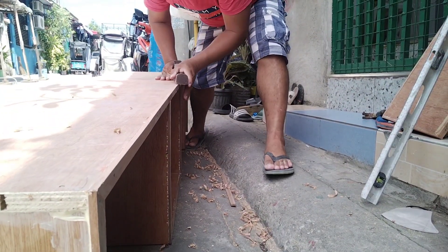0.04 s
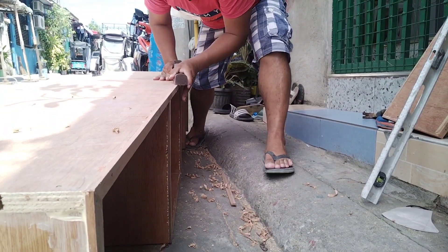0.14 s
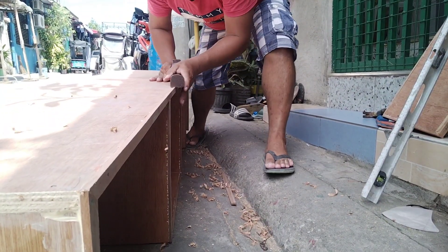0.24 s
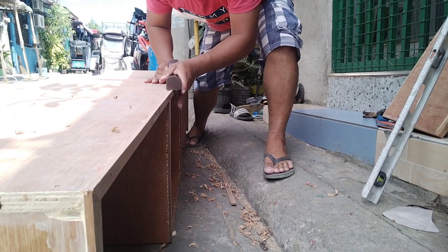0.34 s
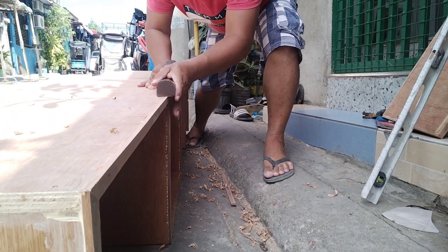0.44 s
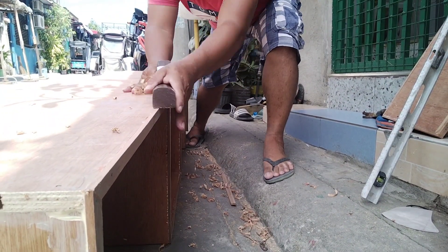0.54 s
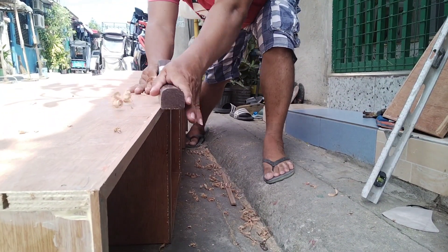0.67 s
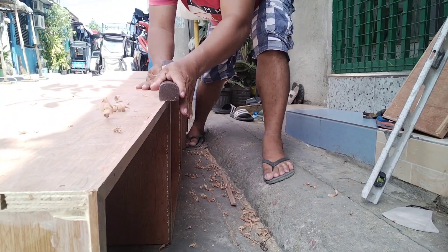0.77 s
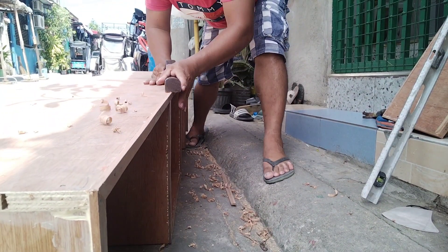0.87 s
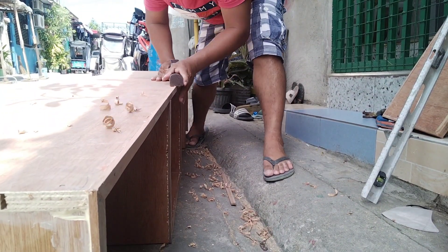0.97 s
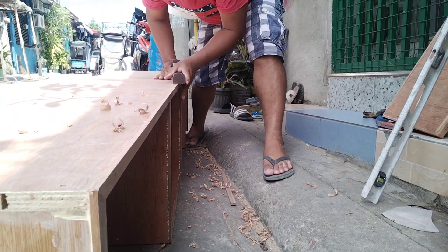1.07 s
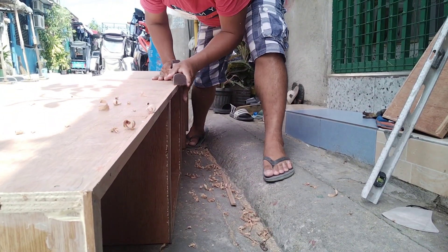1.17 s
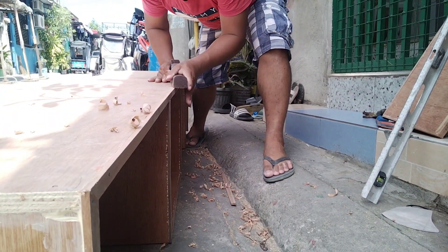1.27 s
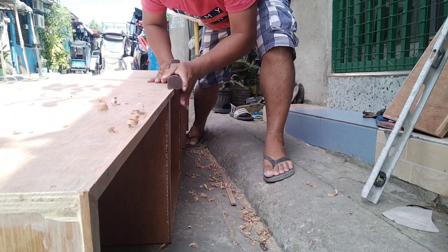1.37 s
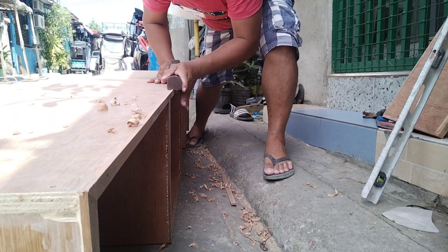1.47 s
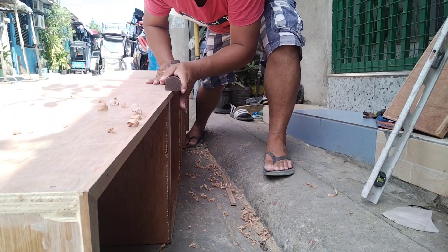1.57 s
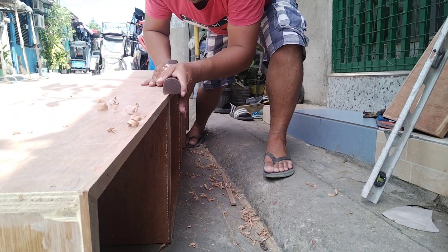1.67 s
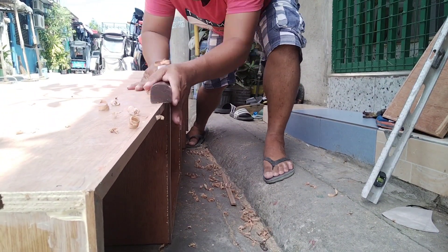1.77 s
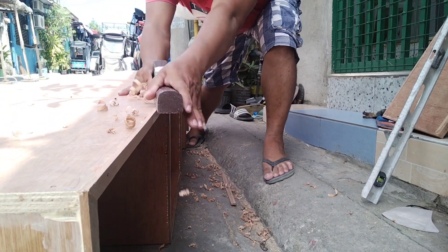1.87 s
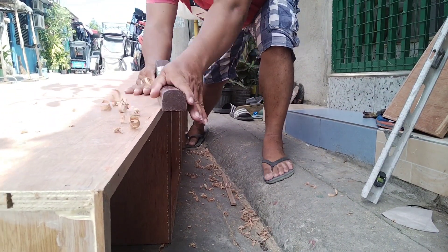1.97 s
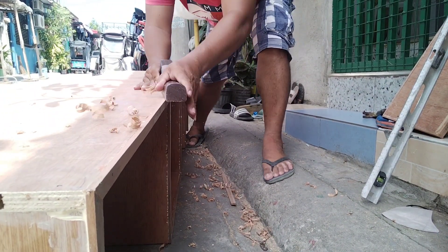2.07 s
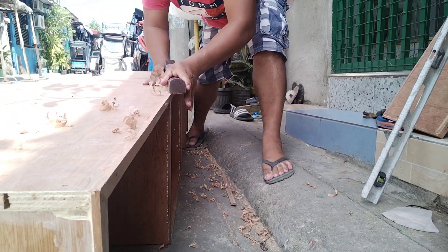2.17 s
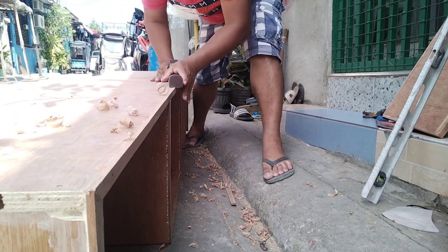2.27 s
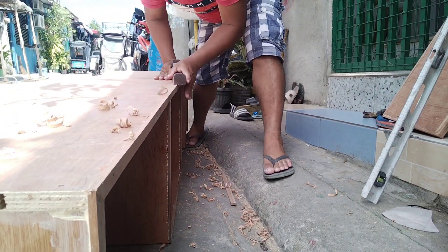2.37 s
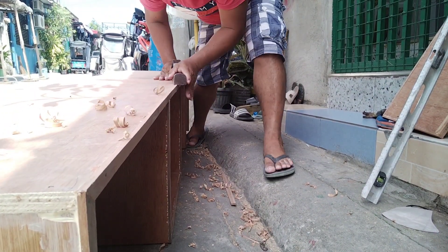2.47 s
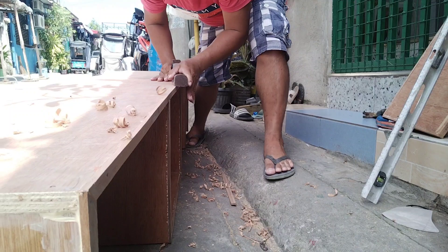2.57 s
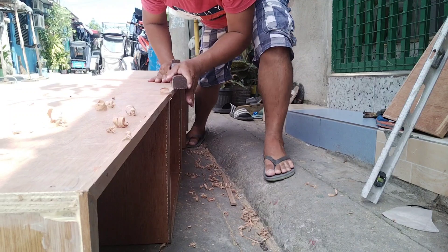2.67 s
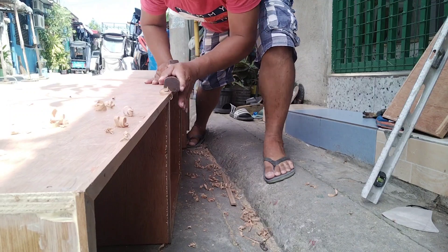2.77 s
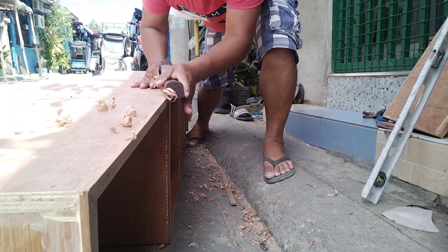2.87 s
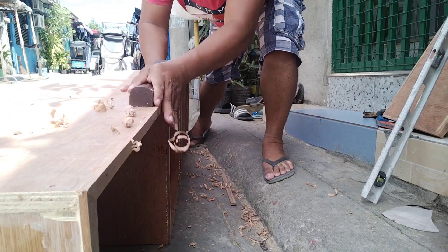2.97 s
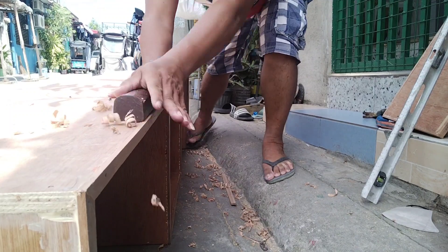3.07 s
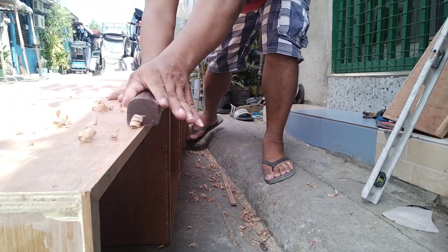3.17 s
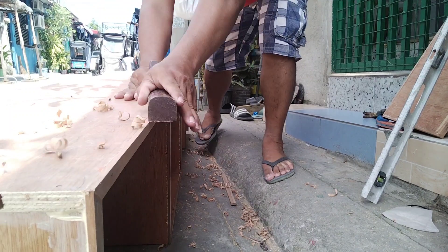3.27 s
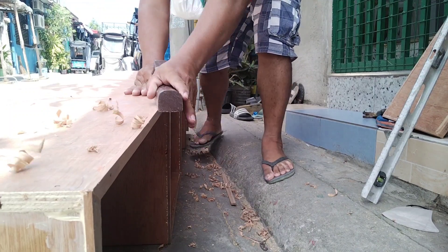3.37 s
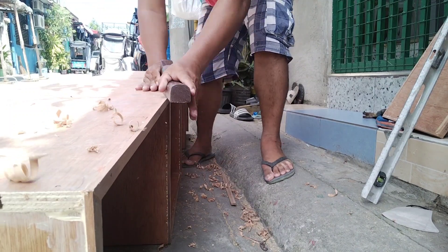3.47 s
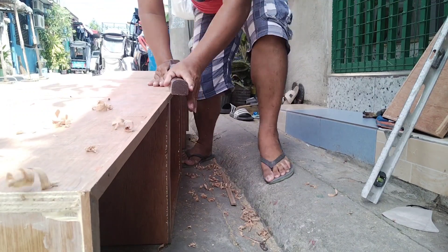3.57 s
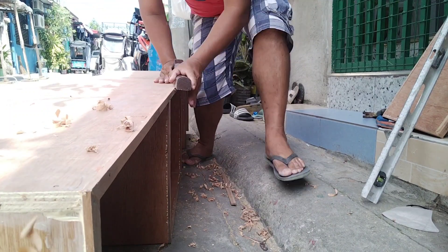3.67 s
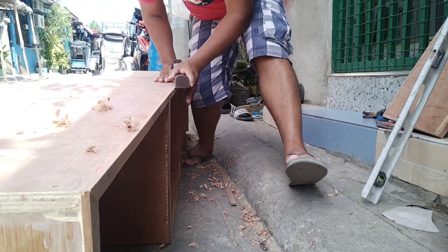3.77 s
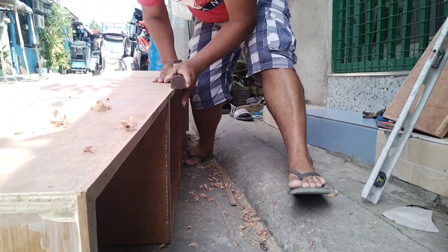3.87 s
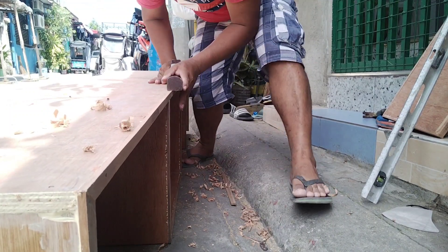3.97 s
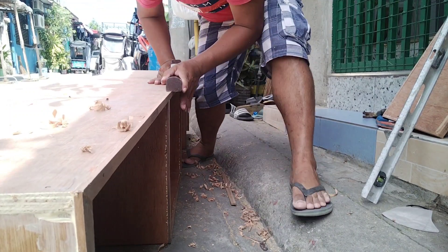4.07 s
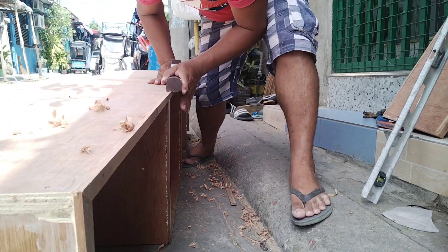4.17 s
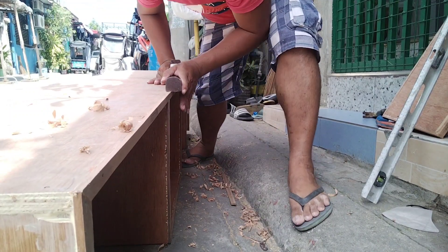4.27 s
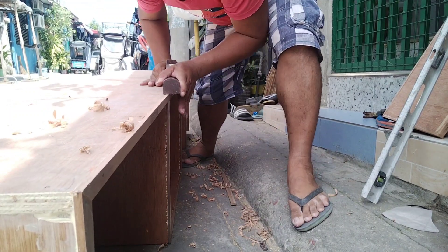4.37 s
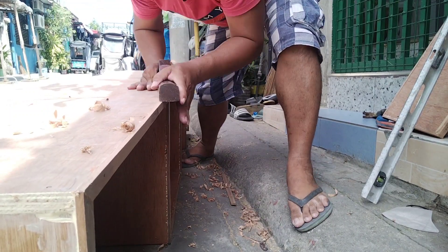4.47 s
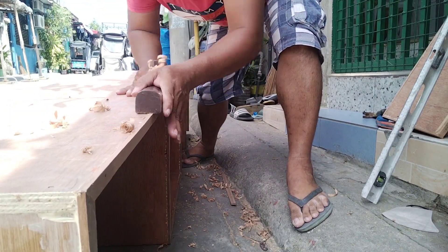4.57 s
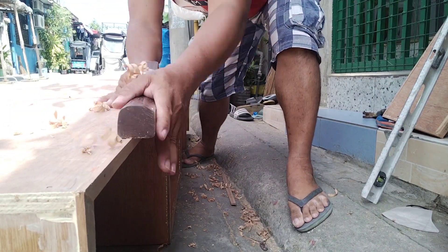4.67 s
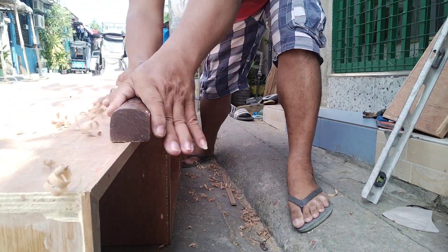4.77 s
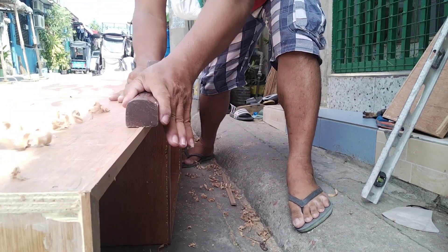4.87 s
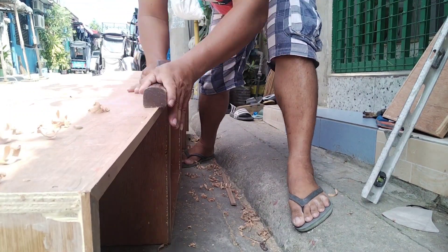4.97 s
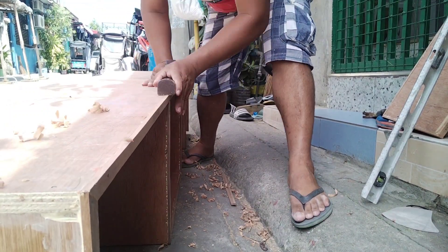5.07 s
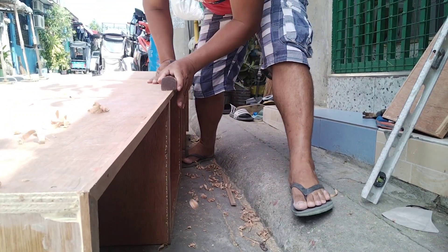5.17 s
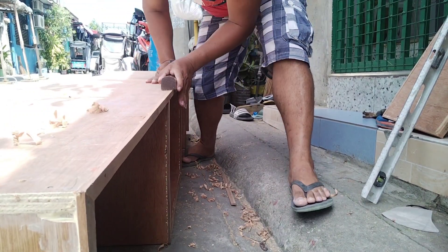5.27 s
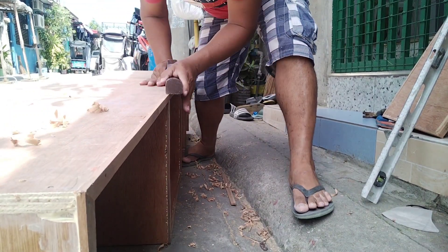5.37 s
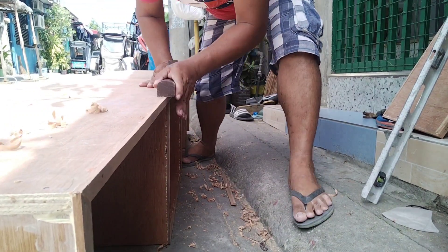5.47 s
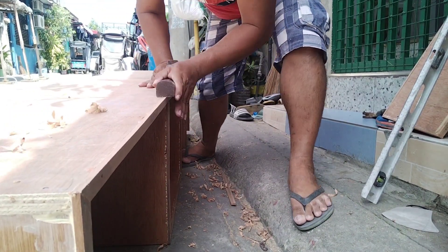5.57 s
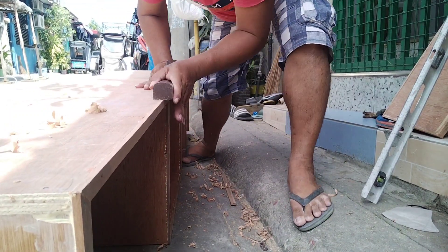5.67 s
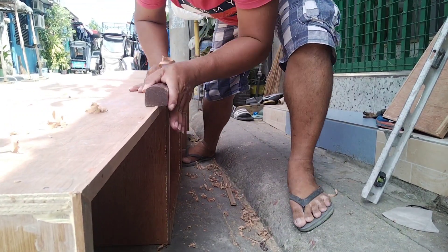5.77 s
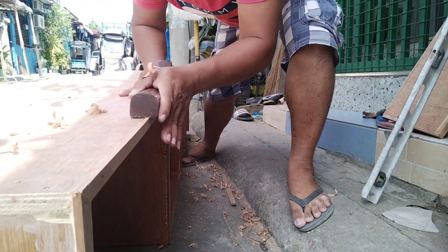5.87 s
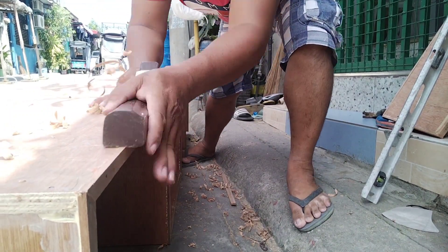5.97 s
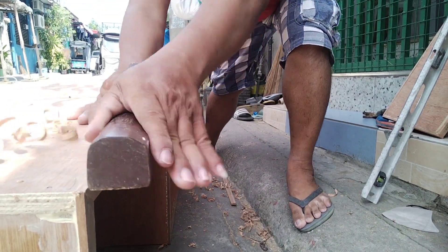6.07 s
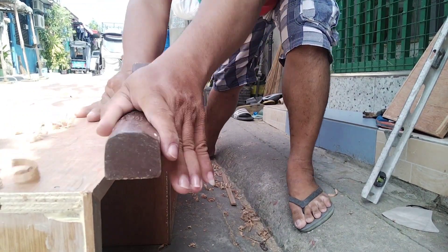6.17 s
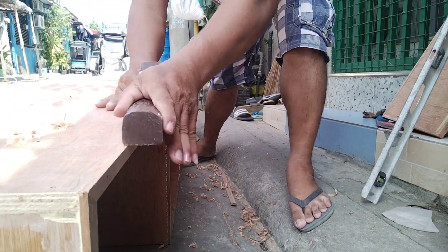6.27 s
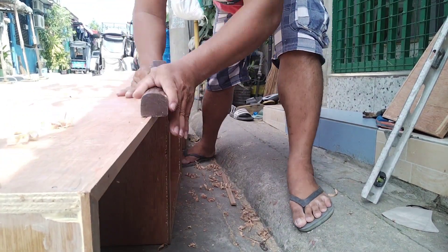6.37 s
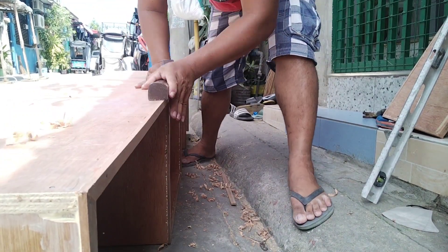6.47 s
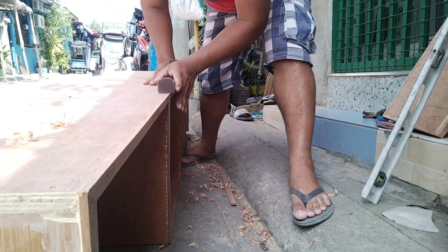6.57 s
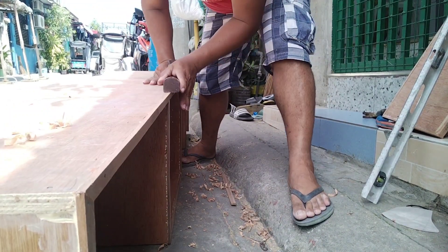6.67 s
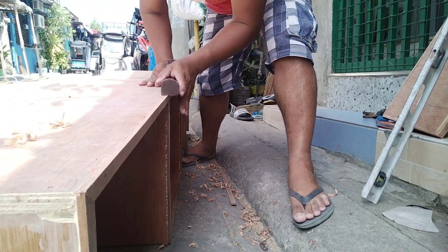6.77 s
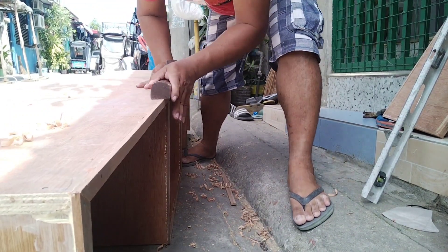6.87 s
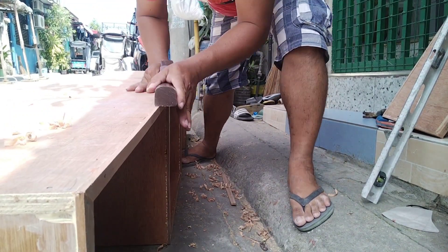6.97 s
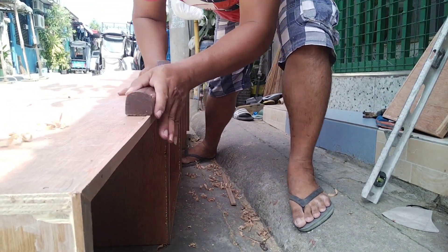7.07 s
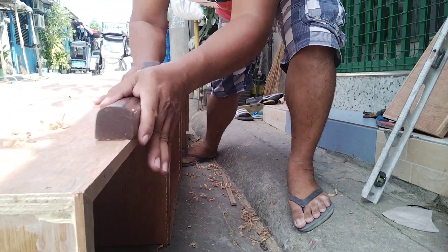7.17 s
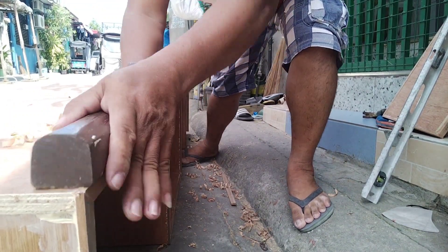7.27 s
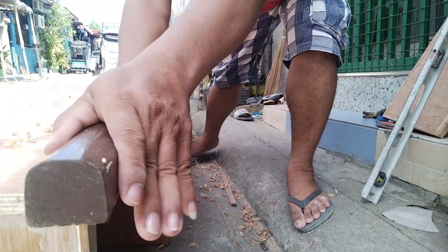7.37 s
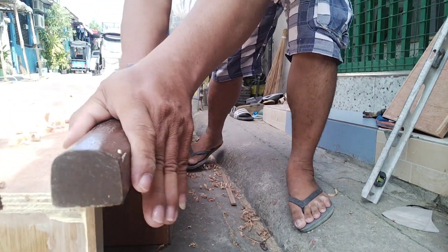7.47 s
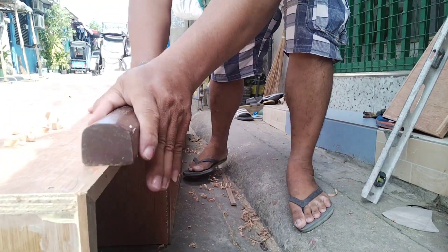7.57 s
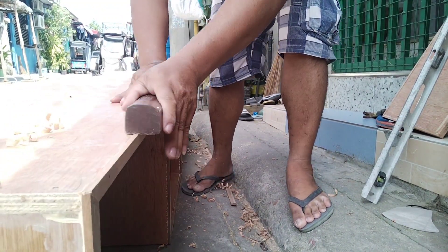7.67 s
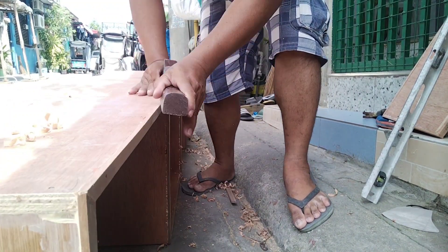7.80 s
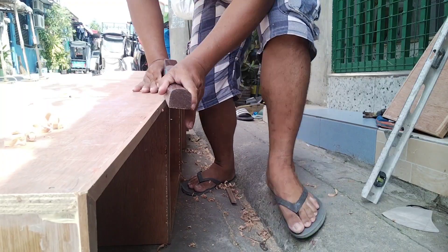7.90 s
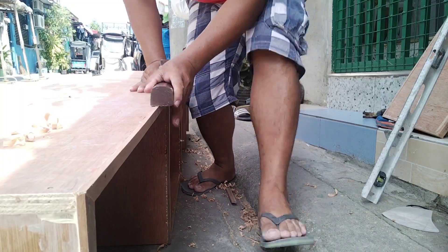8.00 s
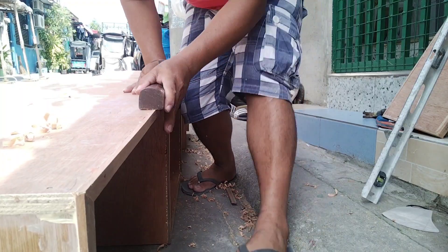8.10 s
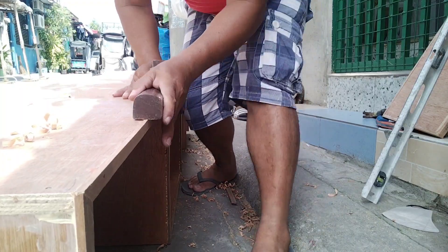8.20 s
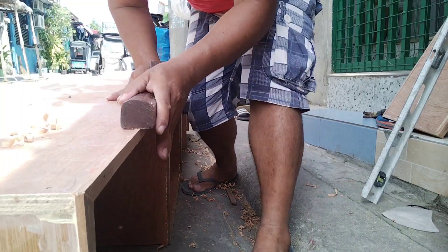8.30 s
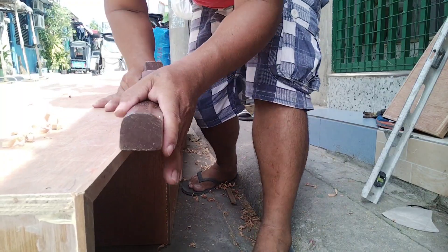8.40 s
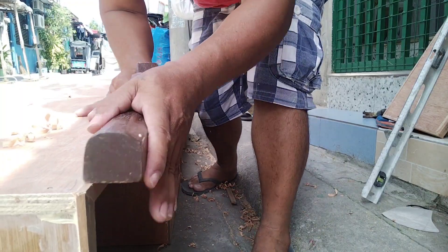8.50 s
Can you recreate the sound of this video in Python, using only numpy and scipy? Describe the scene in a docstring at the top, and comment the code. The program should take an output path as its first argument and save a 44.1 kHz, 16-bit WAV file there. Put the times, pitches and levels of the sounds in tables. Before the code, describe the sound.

Close up outdoors, a hand plane works along the edge of a hollow plywood box. Short harsh rasps burst out, catch with a jerk and break free, with fainter gliding scratches between. The box answers with low hollow thumps and woody cracks, heaviest from about one to four seconds, then sparser. A small microphone picks up slight dry reflections and a soft steady street wash.

```python
"""A wooden hand plane works along the plywood edge of a hollow box, outdoors, close to a small microphone.
Snapping fibres rasp directly and through the blade, and load the top sheet and the box.
The blade glides, lurches through wood, or sticks and breaks free with a jerk.
Blows from jerks and set-downs make the box boom and its top sheet crack.
A short tail returns from walls and ground, over a soft steady wash from the street."""
import sys
import numpy as np
from scipy import signal
from scipy.fft import rfft, irfft, next_fast_len
from scipy.io import wavfile
from scipy.ndimage import uniform_filter1d

SR = 44100
rng = np.random.default_rng(int(sys.argv[2]) if len(sys.argv) > 2 else 0)


def master_out(mix):
    """Clip the mix to full scale and print it as 16-bit PCM to the path in sys.argv[1]."""
    frames = np.transpose(np.atleast_2d(mix))
    ceiling = np.clip(frames, -1, 1)
    pcm = np.round(ceiling * 32767).astype(np.int16)
    wavfile.write(sys.argv[1], SR, pcm)


N = 376613
TIMES = np.arange(N) / SR  # s, every sample
STEPS = np.arange(0, N / SR + .01, .001)  # s, coarser times at which envelopes are worked out


def gain_of(db):
    """Decibels to an amplitude factor."""
    return 10 ** (np.asarray(db) / 20)


def evened(x):
    """Scales to rms 1."""
    return x / np.sqrt(np.mean(x ** 2) + 1e-20)


def add(mix, s, sound):
    """Mixes a sound in at a time in seconds, cut off at the end of the mix."""
    part = mix[round(s * SR):][:len(sound)]
    part += sound[:len(part)]


def filtered(x, points):
    """Passes a signal through a spectrum of (f/Hz, level/dB) points, joined over log frequency."""
    f, db = np.transpose(points)
    size = next_fast_len(len(x), True)
    hz = np.fft.rfftfreq(size, 1 / SR)
    gain = gain_of(np.interp(np.log(hz + 1), np.log(f), db))
    return irfft(rfft(x, size) * gain, size)[:len(x)]


def coloured(x, points):
    """Gives a signal a spectrum and rms 1."""
    return evened(filtered(x, points))


def ring(modes, uneven_db=None):
    """A body's answer to one click: decaying sine modes, total energy 1."""
    t = np.arange(SR // 2) / SR
    if uneven_db is None:
        uneven_db = np.zeros(len(modes))
    answer = np.zeros(len(t))
    for (hz, db, t60), offset_db in zip(modes, uneven_db):
        decay = gain_of(db + offset_db - 60 * t / t60)
        answer += decay * np.sin(2 * np.pi * hz * t) / np.sqrt(t60)
    return answer / np.linalg.norm(answer)


def waver(smooth_s):
    """Smoothed random drift of rms 1."""
    span = max(int(smooth_s * SR), 1)
    once = uniform_filter1d(rng.standard_normal(N), span)
    return evened(uniform_filter1d(once, span))


def swing(power):
    """A power envelope as an amplitude gain for every sample."""
    return np.interp(TIMES, STEPS, np.sqrt(power))


# Wash from the street at the microphone: f/Hz, relative level/dB
STREET_COLOUR = [(40, -24), (90, -28), (165, -1.5), (500, -13.5), (1580, -25.5), (6890, -30.5),
                 (11000, -39)]
STREET_DB = -47


def street():
    """Coloured noise makes a soft outdoor wash whose level wavers slightly."""
    level = gain_of(STREET_DB + 0.5 * waver(0.046))
    return level * coloured(rng.standard_normal(N), STREET_COLOUR)


# The blade lurches through wood: start t/s, length t/s, rasp level/dB going in, coming out,
# load level/dB on the panel going in, coming out
LURCHES = [(0.01, 0.059, -37.5, -41, -27, -25.5), (0.291, 0.17, -27, -20.5, -21.5, -28),
           (0.501, 0.07, -15.5, -23.5, -44, -18), (0.618, 0.061, -28, -23, -55, -13.5),
           (1.371, 0.034, -20.5, -27.5, -15, -13), (1.587, 0.08, -42.5, -41, -18.5, -18),
           (1.715, 0.1, -20.5, -22, -9, -30), (1.952, 0.0033, -20, -59, -7.5, -30),
           (2.647, 0.17, -30.5, -43, -22.5, -24), (2.789, 0.024, -26, -27.5, -11.5, -12.5),
           (2.963, 0.046, -22.5, -26.5, -30.5, -33), (3.17, 0.024, -54, -50, -25.5, -30),
           (4.063, 0.027, -29, -32, -27, -17.5), (4.42, 0.1, -23, -22, -9, -30.5),
           (4.557, 0.064, -21.5, -23, -35, -22.5), (5.488, 0.019, -17.5, -27.5, -25, -16),
           (5.717, 0.11, -39.5, -23, -18.5, -16), (5.861, 0.12, -30, -20, -18.5, -21.5),
           (6.9, 0.0044, -24, -25, -16, -24.5), (6.926, 0.093, -40, -30, -21, -29.5),
           (7.089, 0.026, -19.5, -21, -21.5, -27.5), (7.353, 0.058, -73, -50, -53, -29.5),
           (7.784, 0.063, -26, -51.5, -36, -31.5), (7.873, 0.021, -48, -38.5, -19, -39),
           (8.303, 0.04, -28.5, -32.5, -54, -48), (8.443, 0.049, -32.5, -26, -32.5, -34.5)]
RISE_DB_PER_S, FALL_DB_PER_S = 824, 357.5  # into and out of a cut


def cut_power(in_column, out_column, lag_s=0):
    """Power envelope of the cuts: quick rise, sloping hold, slower fall."""
    power = np.zeros(len(STEPS))
    for row in LURCHES:
        start, end = row[0] + lag_s, row[0] + lag_s + row[1]
        hold_db = np.interp(STEPS, [start, end], [row[in_column], row[out_column]])
        rise_db = RISE_DB_PER_S * (start - STEPS).clip(0)
        fall_db = FALL_DB_PER_S * (STEPS - end).clip(0)
        power += gain_of(2 * (hold_db - rise_db - fall_db))
    return power


def fibres(per_s, spread_db, judder_db):
    """Dense random snaps of uneven size, rms 1, clumped as the grain of the wood changes."""
    size = gain_of(spread_db * np.minimum(rng.exponential(1, N), 5)) * rng.standard_normal(N)
    snapping = rng.random(N) < per_s / SR
    return evened(size * snapping * gain_of(judder_db * waver(0.0099)))


# The scrape is bright while the iron runs fast and drops in pitch as it jams:
# t/s, centre f/Hz before each layer's limits
SCRAPE_PITCH = [(0.296, 6700), (0.363, 1076), (0.43, 4000), (0.487, 6700), (0.521, 3690), (0.657, 6820),
                (0.697, 605), (0.95, 4420), (1.361, 5500), (1.409, 583), (1.663, 620), (1.717, 3020),
                (1.769, 1000), (1.951, 3540), (1.985, 674), (2.643, 4090), (2.71, 594), (2.781, 6830),
                (2.849, 607), (2.964, 6450), (3.02, 700), (3.06, 4320), (3.429, 3780), (3.938, 5540),
                (4.13, 635), (4.42, 647), (4.46, 1123), (4.565, 6500), (4.597, 1400), (5.051, 1477),
                (5.166, 4870), (5.476, 3460), (5.53, 590), (5.72, 720), (5.819, 1060), (6.001, 6060),
                (6.801, 720), (6.894, 3540), (6.951, 816), (7.083, 3800), (7.136, 830), (7.45, 650),
                (7.76, 3740), (8.15, 1300), (8.461, 6400)]
SCRAPE_OCTAVES = 0.7  # half-width of the lifted band, where the lift in dB falls to 1/e


def shifting(x, patchy_db, wide_hz, long_s, lift_db, low_hz, high_hz):
    """The contact point travels: each band is driven now more, now less, the scrape band most."""
    hz, t, z = signal.stft(x, SR, nperseg=512, noverlap=384)
    field = rng.standard_normal(z.shape)
    for _ in range(2):
        field = uniform_filter1d(field, max(int(wide_hz * 512 / SR), 1), 0)
        field = uniform_filter1d(field, max(int(long_s * SR / 128), 1), 1)
    at, centre = np.transpose(SCRAPE_PITCH)
    centre_octave = np.interp(t, at, np.log2(centre.clip(low_hz, high_hz)))
    away = np.log2(hz + 1)[:, None] - centre_octave
    lift = lift_db * np.exp(-(away / SCRAPE_OCTAVES) ** 2)
    shaped = z * gain_of(patchy_db * evened(field) + lift)
    return evened(signal.istft(shaped, nperseg=512, noverlap=384)[1][:N])


# Fibre noise straight to the microphone: f/Hz, relative level/dB
RASP_COLOUR = [(300, -19), (900, 5), (1500, 6.5), (1930, -6), (2500, 5), (3950, 7.5), (5790, -1),
               (6720, -36.5), (9370, -20)]


def direct_rasp(cut):
    """Snaps radiate straight from the tearing wood."""
    return gain_of(1.0) * filtered(cut, RASP_COLOUR)


# Modes of iron and stock: f/Hz, relative level/dB, t60/s
BLADE_MODES = [(2620, 16, 0.0083), (3530, 4, 0.005), (3945, 7, 0.024), (4200, 14.5, 0.0057),
               (6710, 21, 0.0036)]


def blade_ring(cut):
    """Snaps ring the iron and stock of the plane."""
    return gain_of(-6.5) * signal.oaconvolve(cut, ring(BLADE_MODES))[:N]


# Modes of the top sheet: f/Hz, relative level/dB, t60/s
SHEET_MODES = [(510, -1, 0.07), (589, 8, 0.06), (716, 0, 0.04), (843, 1, 0.06), (1017, 10, 0.055),
               (1110, 3, 0.03), (1400, 1.5, 0.025)]


def sheet_ring(push):
    """The load drives the separate modes of the top sheet and a smooth band for its dense upper ones."""
    sheet = gain_of(-5.0) * signal.oaconvolve(push, ring(SHEET_MODES))[:N]
    return sheet + filtered(push, [(500, -16.5), (1700, -0.5), (3200, -9.5), (6000, -59.5)])


# Modes of cavity and walls, which the blows ring too: f/Hz, relative level/dB, t60/s
BOX_MODES = [(121, -26, 0.1), (153, -15.5, 0.12), (172.3, -0.5, 0.23), (206, -9.5, 0.059), (262, 6, 0.15),
             (344, 16.5, 0.15), (375, 15, 0.047)]


def box_rumble(push):
    """The load rumbles in the box and rocks it on the ground."""
    cavity = signal.oaconvolve(push, ring(BOX_MODES))[:N]
    rumble = gain_of(-8.5) * filtered(cavity, [(240, 0.5), (360, -6.0)])
    rocking = filtered(push, [(25, -19), (60, -9), (130, -15), (220, -39)])
    return rumble + rocking


# Trim of the finest hiss: t/s, level/dB
HISS_TRIM = [(0.5, -0.5), (1.999, -6), (4.5, -1), (7.299, 3)]


def fine_hiss(level):
    """The finest snaps hiss through the air above the rasp."""
    trim = gain_of(np.interp(TIMES, *np.transpose(HISS_TRIM)))
    return filtered(level * trim * fibres(9000, 0.97, 1.2), [(7000, -31), (10500, -6.5), (16000, -7.0)])


LOAD_LAG_S = 0.0072  # the panel takes the load of a cut a moment after the blade
CUT_HISS_DB, GLIDE_HISS_DB = -9, -2  # hiss over the rasp, before the trim


def plane():
    """Snaps are heard directly, as hiss, through blade and top sheet, and as a rumble in the box."""
    flutter = sole_flutter()
    cutting = cut_power(2, 3)
    gliding = flutter * glide_power(2)
    rasp = swing(cutting + gliding)
    load = swing(cut_power(4, 5, LOAD_LAG_S) + flutter * glide_power(3))
    hiss = swing(gain_of(2 * CUT_HISS_DB) * cutting + gain_of(2 * GLIDE_HISS_DB) * gliding)
    moving = sticking()
    snaps = shifting(fibres(6000, 1.1, 1.3), patchy_db=4.0, wide_hz=300, long_s=0.03,
                     lift_db=4.5, low_hz=1350, high_hz=7000)
    cut = np.hypot(rasp * moving, jerks()) * snaps
    push = shifting(fibres(6000, 0.48, 1.07), patchy_db=6.0, wide_hz=200, long_s=0.066,
                    lift_db=7.5, low_hz=550, high_hz=2300)
    push *= load * moving
    return direct_rasp(cut) + fine_hiss(hiss * moving) + blade_ring(cut) + sheet_ring(push) + box_rumble(push)


# Blows on the box: t/s, level/dB, pitch of the push f/Hz, hard edge level/dB relative to the second column
BLOWS = [(0.111, -17.5, 147, -23), (0.15, -20, 234, -37), (0.167, -20, 125, -32), (0.188, -21, 129, -20),
         (0.27, -21.5, 200, -19), (0.35, -7, 168, -2), (0.516, -8.5, 203, -28), (0.674, -20, 168, -17),
         (0.803, -13, 158, -8.5), (1.14, -15, 310, -6), (1.403, -3, 179, -36), (1.454, -8.5, 159, -49),
         (1.535, -15.5, 178, -26.5), (1.892, -26, 169, -19), (1.976, -12.5, 165, -28),
         (2.002, -10, 150, -28), (2.042, -9.5, 137, -5.5), (2.076, -19, 209, -5), (2.363, -31.5, 139, 5),
         (2.51, -24, 155, -14.5), (2.607, -19, 186, -15), (2.712, -6.5, 166.5, -8), (2.84, -3.5, 186, -2),
         (3.007, -1.5, 171, -12), (3.046, -1.5, 364, -8.5), (3.124, -2, 192, -17.5), (3.47, -9, 315, -9),
         (3.62, -28, 193, -18), (3.893, -30, 183, -1.5), (4.125, -4.5, 175.5, -40),
         (4.397, -18.5, 158, -15), (4.612, -11, 162, -20), (5.046, -20, 226, 4), (5.119, -15, 220, -38),
         (5.523, -6, 162, -18), (5.634, -15, 166, -40), (5.963, -19.5, 166, 3), (6.764, -13, 215, -3.5),
         (6.936, -11.5, 197, -24), (7.116, -5, 165, -30), (7.362, -22, 184, -20), (7.678, -22, 183, -11.5),
         (8.478, -30, 168, -20)]
UNEVEN_DB = 4  # rms; each blow lands elsewhere and wakes the modes unevenly


def box():
    """A short push rings the box, which shudders on its feet; the hard edge rings the top sheet."""
    out, sheet = np.zeros(N), ring(SHEET_MODES)
    after = np.arange(SR // 4) / SR
    grit = rng.standard_normal((len(BLOWS), len(after)))
    for (s, db, hz, edge_db), shudder in zip(BLOWS, grit):
        walls = ring(BOX_MODES, UNEVEN_DB * rng.standard_normal(len(BOX_MODES)))
        cycles = np.arange(int(3.5 * SR / hz)) / SR * hz
        push = np.sin(2 * np.pi * cycles) * cycles ** 2 * np.exp(-2.2 * cycles)
        jolts = .016 * shudder * gain_of(-60 * after / 0.35)
        jolts[0] += 1  # the main impact ahead of the shudder
        blows = signal.fftconvolve(jolts, push)
        boom = signal.fftconvolve(blows, walls)
        boom = 0.57 * boom / abs(boom).max()
        rattle = signal.fftconvolve(jolts, walls)
        boom[:len(rattle)] += 0.25 * rattle / abs(rattle).max()  # loose joints wake the upper modes
        boom[:len(blows)] += 0.49 * blows / abs(blows).max()  # the blow itself, before the walls take it up
        tick = shudder * np.exp(-after / 0.013)
        edge = signal.fftconvolve(tick, sheet)
        edge[:len(tick)] += 0.55 * signal.lfilter(*signal.butter(2, 2500, fs=SR), tick)
        add(out, s, gain_of(db) * boom)
        add(out, s, gain_of(db + edge_db) * edge / abs(edge).max())
    return out


# The blade catches suddenly and breaks free: t/s, level/dB before the jerk's rise and decay
CATCHES = [(0.257, -36), (0.298, -21.5), (0.498, -18), (0.6387, -19), (1.271, -35.5), (1.9496, -27.5),
           (2.037, -34.5), (2.774, -21), (3.0566, -14.5), (3.935, -33.5), (4.0829, -20), (5.4637, -23),
           (5.4804, -20.5)]


def sticking():
    """Gain that sinks by up to 9 dB as the plane sticks for a moment before it breaks free."""
    stall, wind_up = np.zeros(N), np.linspace(0, 1, int(0.058 * SR)) ** 2
    for at, _ in CATCHES:
        add(stall, at - len(wind_up) / SR, wind_up)
    return gain_of(-9 * np.minimum(stall, 1))


def jerks():
    """Envelope of the jerks: a sudden release of snaps that dies away."""
    envelope = np.zeros(N)
    after = np.arange(SR // 5) / SR
    for at, db in CATCHES:
        add(envelope, at, gain_of(db - 60 * after / 0.067) * (1 - np.exp(-after / 0.0013)))
    return envelope


# The sole glides over the edge, speeding up and slowing down:
# start t/s, length t/s, rasp level/dB, load level/dB on the panel
SOLE_GLIDES = [(0.709, 0.45, -36.5, -35), (1.256, 0.079, -43, -34.5), (1.509, 0.58, -43.5, -30.5),
               (2.021, 0.44, -34, -32), (2.542, 0.69, -37, -29.5), (3.291, 0.6, -42.5, -28.5),
               (3.947, 0.18, -44, -31.5), (4.412, 0.43, -36, -46), (4.903, 0.4, -39.5, -36.5),
               (5.397, 0.19, -37, -31.5), (5.625, 0.73, -42.5, -36), (6.222, 0.46, -36.5, -37.5),
               (6.773, 0.26, -44.5, -32), (7.057, 0.43, -42, -43), (7.53, 0.52, -46, -46),
               (8.06, 0.41, -45.5, -39.5)]
ARCH_ENDS_DB, GLIDE_FLATNESS = -24.5, 4.84  # level at both ends of a glide; exponent, higher is flatter


def glide_power(level_column):
    """Power envelope of the glides, each one swelling and sinking."""
    power = np.zeros(len(STEPS))
    for row in SOLE_GLIDES:
        off_centre = abs(2 * (STEPS - row[0]) / row[1] - 1)  # 0 in the middle, 1 at the ends
        power += gain_of(2 * (row[level_column] + ARCH_ENDS_DB * off_centre ** GLIDE_FLATNESS))
    return power


FLUTTER_DB, FLUTTER_S = 2.5, 0.0079  # rms and smoothing; the sole skips and scratches
CATCH_DB, CATCH_S = 2.5, 0.022  # rms and smoothing; it drags and frees itself more slowly


def sole_flutter():
    """Random power swing of mean 1 as the gliding sole skips, drags and frees itself."""
    swing_db = FLUTTER_DB * waver(FLUTTER_S) + CATCH_DB * waver(CATCH_S)
    flutter = np.interp(STEPS, TIMES, gain_of(2 * swing_db))
    return flutter / flutter.mean()


def yard(x):
    """Walls and ground return a short diffuse tail: decaying noise that starts after 4 ms."""
    t = np.arange(SR // 3) / SR
    tail = rng.standard_normal(len(t)) * gain_of(-60 * t / 0.06) * (t > .004)
    return signal.oaconvolve(x, tail / np.linalg.norm(tail))[:N]


YARD_DB = -8  # returned tail against the direct sound


def scene():
    """Plane and box in the yard, with the street behind them."""
    work = plane() + box()
    return (work + gain_of(YARD_DB) * yard(work) + street())[None]


# Response of the small microphone: f/Hz, level/dB
MICROPHONE_COLOUR = [(20, -26.5), (60, -9.5), (110, 0), (7200, -3), (8600, -11), (9600, -20),
                     (10800, -16.5), (15000, -12.5)]
BAND_LIMIT_HZ = 15700


def record(dry):
    """Microphone colour, peaks that round off softly, then the band limit."""
    heard = filtered(dry[0], MICROPHONE_COLOUR)[None]
    soft = 1.133 * np.tanh(heard / 0.99)
    low_pass = signal.firwin(511, BAND_LIMIT_HZ, window=("kaiser", 9), fs=SR)
    return signal.oaconvolve(soft, low_pass[None], "same")


dry = scene()
out = record(dry)
master_out(out)
```